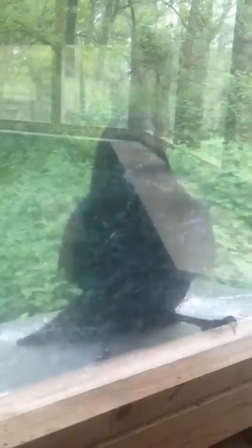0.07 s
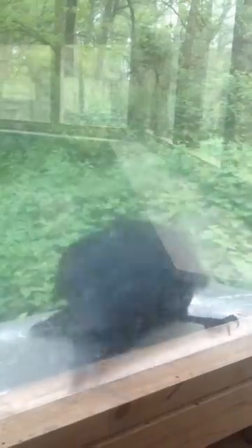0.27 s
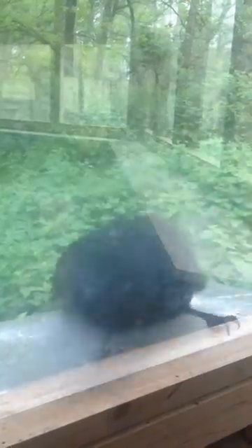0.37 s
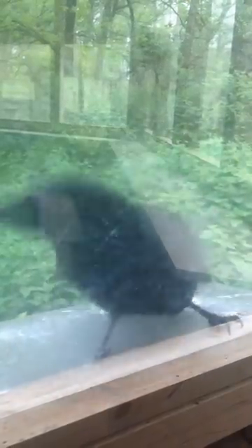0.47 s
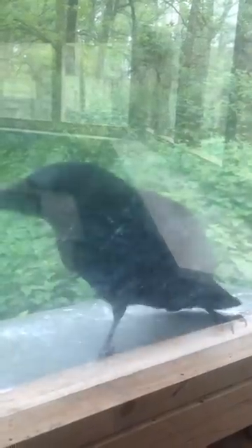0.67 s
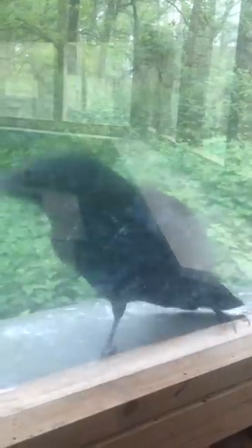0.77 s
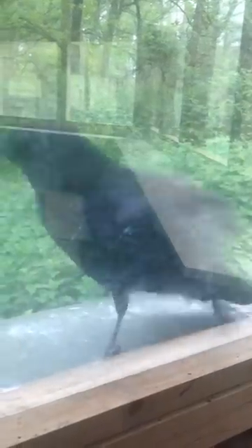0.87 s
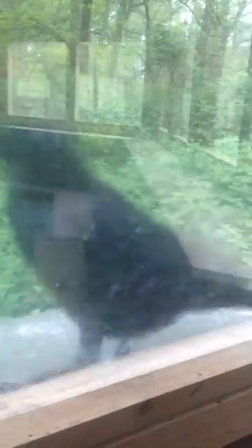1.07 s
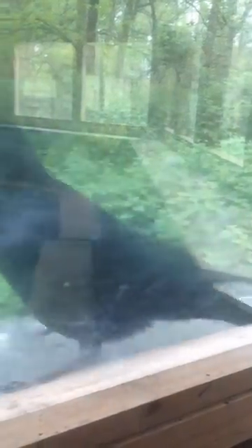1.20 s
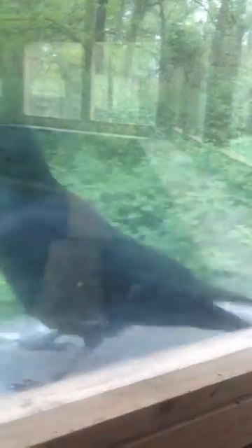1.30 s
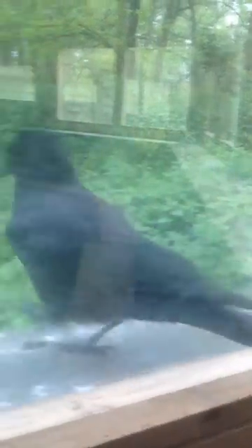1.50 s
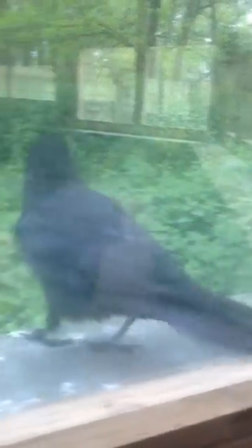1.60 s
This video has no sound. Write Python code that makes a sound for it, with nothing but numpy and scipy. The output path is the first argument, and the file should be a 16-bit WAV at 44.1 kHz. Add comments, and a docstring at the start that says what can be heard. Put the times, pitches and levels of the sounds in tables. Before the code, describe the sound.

A crow pecks a window once at about 0.25 seconds, a sharp crack with a low boom and brief rattle, ringing in the room for half a second. A few light ticks follow. From about 1 second, soft scuffs and claw scratches move along the metal ledge, with two lightly ringing steps near 1.15 and 1.35 seconds and a last scuff at 1.55. Faint hum, air and distant birds lie underneath.

```python
"""A low hum and quiet outdoor air are heard first, with soft rumbles of a ledge and faint, distant birds.
Then a crow strikes the window once with its beak, heard from the room inside: the impact gives a sharp
crack, the pane booms in its normal modes, the frame clatters and the room reverberates.
The bird scuffs and steps away along the metal ledge: friction excites the scuffs and scratches,
and each footfall sets the ledge ringing."""
import sys
import numpy as np
from scipy import signal
from scipy.fft import rfft, irfft
from scipy.io import wavfile
from scipy.ndimage import uniform_filter1d

SR = 44100
rng = np.random.default_rng(int(sys.argv[2]) if len(sys.argv) > 2 else 0)


def to_wav(s):
    """Save 16-bit WAV."""
    ch = np.atleast_2d(s).T  # columns
    pcm = np.round(np.clip(ch, -1, 1) * 32767)  # PCM
    wavfile.write(sys.argv[1], SR, pcm.astype(np.int16))


N = 72765
T = np.arange(N) / SR
HZ = np.fft.rfftfreq(N, 1 / SR)

# Partials of the hum: (frequency [Hz], level [dB])
HUM_PARTIALS = [(68, -66), (99, -69), (200, -72), (300, -68.5), (500, -79.5)]
# Outdoor air: (frequency [Hz], relative density [dB])
AIR_SPECTRUM = [(20, -33), (45, -4), (70, 0), (150, -6), (250, -13.5), (400, -12), (1100, -16.5),
                (1300, -14.5), (1750, -21.5), (3200, -27.5), (4500, -29), (8000, -35.5), (15000, -37)]
# The ledge rumbling as the bird shifts its weight: (time [s], duration [s], level [dB], pitch [Hz])
LEDGE_RUMBLES = [(-.02, 0.065, -43.5, 138.5), (0.035, 0.089, -57, 94), (0.119, 0.098, -60.5, 106),
                 (0.424, 0.11, -48, 136.7), (0.501, 0.19, -55.5, 67.05), (0.758, 0.27, -55.5, 70.3),
                 (1.041, .16, -48, 85), (1.042, 0.16, -54, 201), (1.23, 0.13, -52.5, 155),
                 (1.526, 0.17, -55.5, 68.5)]
# Distant birds: (time [s], duration [s], starting pitch [Hz], glide [Hz/s], relative level [dB])
BIRD_WHISTLES = [(.03, .06, 2720, -3600, -68), (.09, .12, 2350, -1000, -72), (.19, .05, 2520, 4500, -68),
                 (.1, .1, 1310, 0, -67), (.54, .09, 2550, -500, -72), (.635, .14, 3240, 700, -69),
                 (.6, .12, 1290, 150, -66)]
# Reverberation time of the room: (frequency [Hz], T60 [s])
ROOM_T60 = [(100, 0.52), (300, 0.51), (1000, 0.48), (3000, 0.43), (6000, 0.36), (12000, 0.22)]

# Normal modes of the window: (frequency [Hz], level [dB], T60 [s])
PANE_MODES = [(67.5, -36, 0.63), (133.6, -30.5, 0.53), (149, -35, 0.186), (160.2, -30.5, 0.31),
              (195, -26.5, 0.077), (222, -35, 0.54), (251.6, -31.5, 0.206), (286, -31.5, 0.24),
              (323, -31, 0.37), (443, -29.5, 0.1), (625, -19, 0.053), (726, -19.5, 0.021),
              (880, -20, 0.042), (980, -27, 0.057), (1069, -24.5, 0.057), (1231, -20, 0.045),
              (1415, -25, 0.06), (1555, -27, 0.038), (2180, -24, 0.024), (3080, -21, .025),
              (4260, -21.5, 0.02), (4910, -29.5, 0.026), (5300, -25, 0.05), (8700, -43, 0.038),
              (9620, -29.5, 0.025), (11600, -46.5, 0.022)]
# Beak contact, frame clatter, and wall and room ringing on: (frequency [Hz], relative density [dB])
CLICK_SPECTRUM = [(25, -55), (60, -11), (200, 3), (700, -3.5), (1350, -3.5), (1800, -26.5), (4500, -15.5),
                  (7000, -31), (14000, -24)]
CLATTER_SPECTRUM = [(25, -50), (60, -14), (150, -12), (900, 0), (1400, 7), (1800, -7), (4500, -0.5),
                    (7000, -14), (11000, -15.5), (15000, -25)]
TAIL_SPECTRUM = [(59, -29), (100, -12), (324, -8), (383, -9.5), (524, -14), (942, -10), (1590, -18.5),
                 (2050, -20), (2470, -23), (4180, -25), (5960, -30.5), (8520, -34.5), (15000, -40)]
# Light touches as beak and claws shift: (time [s], level [dB])
TICK_EVENTS = [(.301, -47), (.364, -42.5), (0.458, -51.5), (1.107, -58), (1.125, -48), (1.231, -58)]
# One such touch: (frequency [Hz], relative density [dB])
TICK_SPECTRUM = [(200, -14), (1500, 2), (4000, -3.5), (9000, -19), (15000, -26)]

# Feet and feathers rubbing: (time [s], duration [s], level [dB], tilt [dB/octave], relative ring [dB])
SCUFF_STROKES = [(0.751, 0.063, -60, -0.5, -39), (0.812, .07, -67, -0.5, -21),
                 (1.041, 0.18, -50.5, 0.5, -3.5), (1.12, 0.028, -41, 0.5, -13),
                 (1.2, 0.088, -57.5, -0.5, -2), (1.254, 0.091, -47, -0.5, -18.5),
                 (1.462, 0.071, -56, -2, -13), (1.519, 0.043, -54, 6.5, -9), (1.536, 0.11, -44.5, 1.5, -3)]
# Claws dragged on the metal: (time [s], duration [s], level [dB], tilt [dB/octave])
SCRATCH_STROKES = [(.976, 0.016, -54.5, 0), (0.989, .014, -46.5, 5), (.998, 0.0094, -43.5, 0.5),
                   (1.007, .012, -43.5, -1), (1.043, 0.17, -63.5, 17), (1.225, 0.064, -63.5, 6),
                   (1.327, 0.0082, -39.5, -1.5), (1.336, 0.013, -51, -4.5)]
# Friction noise of each, before the tilt: (frequency [Hz], relative density [dB])
SCUFF_SPECTRUM = [(40, -13), (120, 5), (250, -2.5), (400, -0.5), (750, -3), (1000, -3), (1400, -5),
                  (2300, -6), (3000, -14), (4500, -18), (8000, -28), (15000, -38.5)]
SCRATCH_SPECTRUM = [(150, -22), (600, -0.5), (1100, -8), (2000, -3.5), (3000, 2), (5000, -2.5),
                    (7000, -5.5), (11000, -13), (15000, -23)]
# Resonances under a scuff and a scratch: (frequency [Hz], width [Hz], relative level [dB])
HOLLOW_RESONANCES = [(376, 70, -4.5), (437.6, 35, -2.5), (487, 38, -5), (969, 40, -10.5)]
SQUEAK_RESONANCES = [(1800, 240, -11), (2430, 130, -9), (2856, 150, -4.5), (3700, 120, -13.5),
                     (4280, 290, -3.5), (6630, 170, -14.5)]

# Steps on the ledge: (time [s], claw [dB], thud [dB], ring [dB], struck spot [Hz], spot level [dB])
FOOTFALLS = [(1.160, -39.5, -37, -42.5, 844.4, -33.5), (1.351, -36.5, -37.5, -40.5, 722, -36)]
# Claw contact and thud of a step: (frequency [Hz], relative density [dB])
CLAW_SPECTRUM = [(300, -11), (1500, 0.5), (4000, 1), (6500, -6), (10000, -2.5), (15000, -8)]
THUD_SPECTRUM = [(25, -42), (60, -1), (120, -6), (230, 3.5), (330, -4.5), (600, -2), (850, -4), (1150, -9),
                 (1600, -14), (2400, -25), (6000, -37), (12000, -55)]
# Normal modes of the ledge: (frequency [Hz], relative level [dB], T60 [s])
LEDGE_MODES = [(62.8, -3.5, 0.36), (111.6, -4, 0.43), (221.7, 3.5, 0.404), (262, -2.5, 0.49),
               (408, -10.5, 0.35), (835, -7.5, 0.24), (1055, -2, 0.28), (2190, -13, 0.23)]

CONTACT_WET_DB, SCUFF_WET_DB = -10, -5  # reverberation relative to the direct sound


def amp(db):
    """Amplitude ratio of a level in decibels."""
    return 10 ** (np.asarray(db) / 20)


def unit(x):
    """Normalisation to rms 1."""
    return x / np.sqrt(np.mean(x ** 2) + 1e-20)


def curve_at(points, hz):
    """Interpolation on a logarithmic frequency axis."""
    frequencies, values = np.transpose(points)
    return np.interp(np.log(hz + 1), np.log(frequencies), values)


def add(mix, time, sound):
    """Superposition of a sound on the mix, starting at a time in seconds."""
    start = round(time * SR)
    sound = sound[max(-start, 0):]
    part = mix[max(start, 0):][:len(sound)]
    part += sound[:len(part)]


def colour(x, spectrum, tilt_db=0):
    """Linear filtering by a spectrum tilted about 1 kHz, scaled to rms 1."""
    octaves = np.log2(np.maximum(HZ, 100) / 1000)
    gain = amp(curve_at(spectrum, HZ) + tilt_db * octaves)
    return unit(irfft(rfft(x) * gain, N))


def noise(spectrum):
    """Stationary Gaussian noise, filtered to a spectrum."""
    return colour(rng.standard_normal(N), spectrum)


def hum():
    """A low hum: steady partials superposed in random phase."""
    return sum(amp(db) * np.sin(2 * np.pi * (hz * T + rng.random())) for hz, db in HUM_PARTIALS)


def outdoor_air(level_db=-63):
    """Broadband noise with its greatest density in the bass."""
    return amp(level_db) * noise(AIR_SPECTRUM)


def narrowband(hz, width_hz):
    """A randomly driven resonance: random phases under a Lorentzian peak."""
    phases = np.exp(2j * np.pi * rng.random(len(HZ)))
    detuning = 2 * (HZ - hz) / width_hz
    return unit(irfft(phases / (1 + detuning ** 2), N))


def waver(hz, width_hz):
    """Random frequency modulation: the pitch wanders at constant amplitude."""
    phase = np.angle(signal.hilbert(narrowband(hz, width_hz)))
    return np.sqrt(2) * np.cos(phase)


def swell(duration, peak_fraction=0.32):
    """Amplitude envelope of one stroke: a quarter-sine rise and a slower fall."""
    return np.sin(np.pi / 2 * np.interp(T / duration, [0, peak_fraction, 1], [0, 1, 0]))


def ledge_rumbles(relative_width=0.25):
    """Forced vibration: the ledge swells with low tones under the bird's shifting weight."""
    out = np.zeros(N)
    for time, duration, db, hz in LEDGE_RUMBLES:
        add(out, time, amp(db) * swell(duration) * waver(hz, hz * relative_width))
    return out


def decay(t60, t=T):
    """Exponential damping: a fall of 60 dB in t60 seconds."""
    return np.exp(-np.log(1000) * t / t60)


def room_decay(x):
    """Frequency-dependent absorption: each band dies with its own reverberation time."""
    hz, t, bands = signal.stft(x, SR, nperseg=256)
    t60 = curve_at(ROOM_T60, hz)[:, None]
    return signal.istft(bands * decay(t60, t), SR, nperseg=256)[1][:N]


def with_room(x, wet_db):
    """Reverberation: the direct sound plus its convolution with a diffuse impulse response."""
    response = room_decay(rng.standard_normal(N))
    return x + amp(wet_db) * signal.fftconvolve(x, response / np.linalg.norm(response))[:N]


def distant_birds(gain_db=-6.5, width_hz=110):
    """Wavering whistles in linear frequency sweeps, blurred by reverberation."""
    out = np.zeros(N)
    for time, duration, hz, hz_per_s, db in BIRD_WHISTLES:
        tone = signal.hilbert(waver(hz, width_hz))
        glide = np.exp(1j * np.pi * hz_per_s * T ** 2)
        add(out, time, amp(db) * swell(duration) * (tone * glide).real)
    return amp(gain_db) * with_room(out, wet_db=-4)


def click(spectrum):
    """A minimum-phase impulse of unit energy, concentrated at its onset."""
    log_gain = np.log(amp(curve_at(spectrum, abs(np.fft.fftfreq(N, 1 / SR)))))
    response = np.exp(np.conj(signal.hilbert(log_gain)))
    pulse = np.fft.ifft(response).real * (T < .05)
    return pulse / np.linalg.norm(pulse)


def ring(modes):
    """Free vibration in damped normal modes; neighbours start in opposite directions."""
    return sum((-1) ** k * amp(db) * decay(t60) * np.sin(2 * np.pi * hz * T)
               for k, (hz, db, t60) in enumerate(modes))


def burst(spectrum, t60):
    """A damped transient: a dense cluster of impulses, whitened and then coloured."""
    cluster = rng.standard_normal(N) * decay(t60)
    bins = rfft(cluster)
    smoothed_power = uniform_filter1d(abs(bins) ** 2, size=600)
    whitened = irfft(bins / np.sqrt(smoothed_power), N)
    return np.std(cluster) * colour(whitened, spectrum)


def peck(time=0.247, tail_rise_s=0.0031):
    """Impulsive excitation: the beak clicks, the pane rings, the frame clatters, the room rings on."""
    contact = amp(3) * click(CLICK_SPECTRUM)
    clatter = amp(-15.5) * burst(CLATTER_SPECTRUM, t60=0.031)
    build_up = 1 - np.exp(-T / tail_rise_s)
    tail = amp(-28) * room_decay(noise(TAIL_SPECTRUM)) * build_up
    out = np.zeros(N)
    add(out, time, contact + ring(PANE_MODES) + clatter + tail)
    return out


def ticks():
    """Light impacts of beak or claw: brief contact gives a bright transient."""
    out = np.zeros(N)
    for time, db in TICK_EVENTS:
        add(out, time, amp(db) * burst(TICK_SPECTRUM, t60=0.043))
    return with_room(out, CONTACT_WET_DB)


def friction(slips_per_s=2500, slip_share=0.45):
    """Stick-slip friction: tiny random slips over a smooth hiss."""
    slips = rng.standard_normal(N) * (rng.random(N) < slips_per_s / SR)
    return slip_share * unit(slips) + (1 - slip_share) * rng.standard_normal(N)


def resonances(table):
    """Resonances sustained by friction, each a narrow band of noise."""
    return sum(amp(db) * narrowband(hz, width_hz) for hz, width_hz, db in table)


def scuffing():
    """Sliding friction: claws squeak on the metal; feet and feathers excite duller, hollow resonances."""
    scratches, scuffs = np.zeros((2, N))
    for time, duration, db, tilt_db in SCRATCH_STROKES:
        scrape = colour(friction(), SCRATCH_SPECTRUM, tilt_db)
        squeak = amp(-1) * resonances(SQUEAK_RESONANCES)
        add(scratches, time, amp(db) * swell(duration) * unit(scrape + squeak))
    for time, duration, db, tilt_db, hollow_db in SCUFF_STROKES:
        rub = colour(friction(), SCUFF_SPECTRUM, tilt_db)
        hollow = amp(hollow_db) * resonances(HOLLOW_RESONANCES)
        add(scuffs, time, amp(db) * swell(duration) * (rub + hollow))
    return with_room(scratches, CONTACT_WET_DB) + with_room(scuffs, SCUFF_WET_DB)


def steps(load_rise_s=0.007):
    """Impact excitation: the claws land first, then the weight sets the ledge's modes ringing."""
    claws, ledge = np.zeros((2, N))
    loading = np.minimum(T / load_rise_s, 1)
    for time, claw_db, thud_db, ring_db, spot_hz, spot_db in FOOTFALLS:
        add(claws, time, amp(claw_db) * burst(CLAW_SPECTRUM, t60=0.056))
        thud = amp(thud_db) * noise(THUD_SPECTRUM) * decay(t60=0.38)
        modes = amp(ring_db) * ring(LEDGE_MODES)
        struck_spot = ring([(spot_hz, spot_db, 0.14)])  # T60 of 0.14 s
        add(ledge, time, (thud + modes + struck_spot) * loading)
    return with_room(claws, CONTACT_WET_DB) + ledge


def scene():
    """Linear superposition of the crow's sounds and the background in one channel."""
    crow = peck() + ticks() + steps() + scuffing() + ledge_rumbles()
    background = distant_birds() + hum() + outdoor_air()
    return (crow + background)[None]


def record(dry, cutoff_hz=15400):
    """Band limiting by a linear-phase low-pass filter."""
    low_pass = signal.firwin(255, cutoff_hz, window=("kaiser", 8), fs=SR)
    return signal.oaconvolve(dry, low_pass[None], "same")


dry = scene()
out = record(dry)
to_wav(out)
```